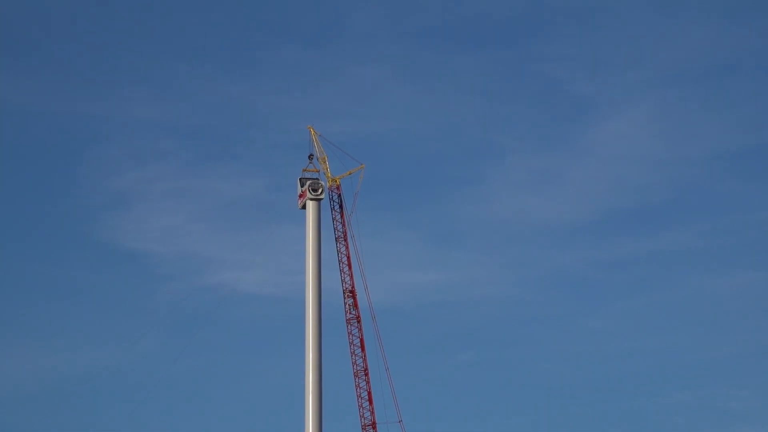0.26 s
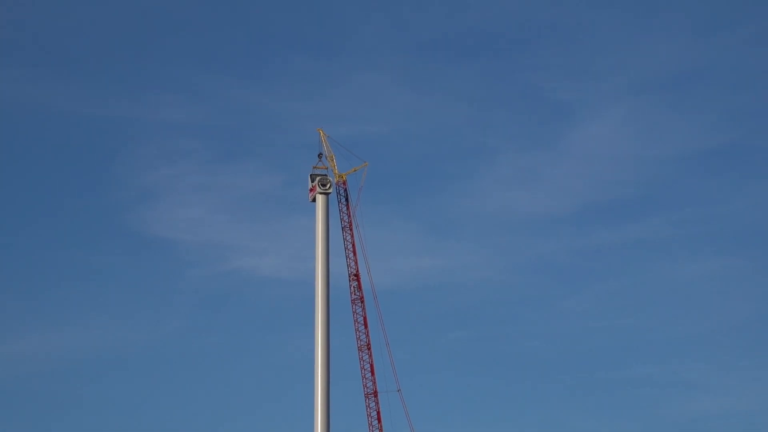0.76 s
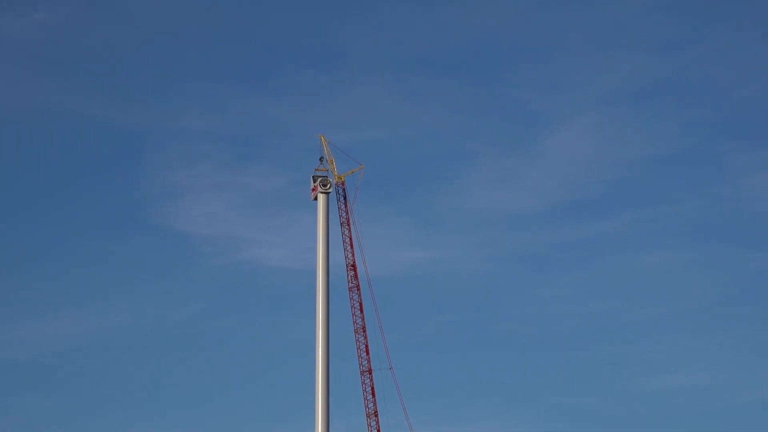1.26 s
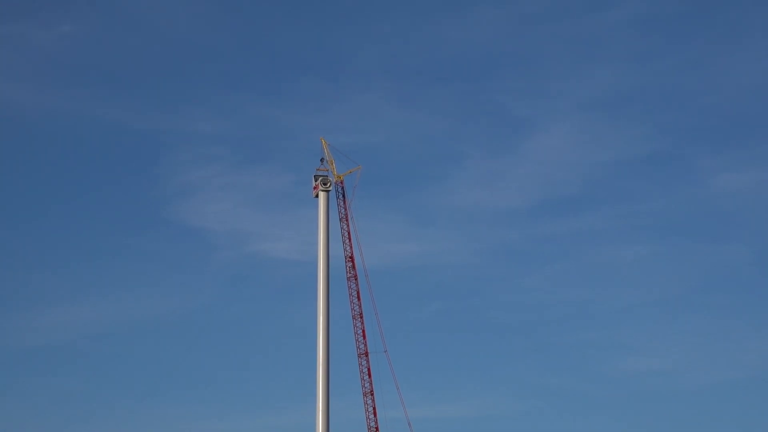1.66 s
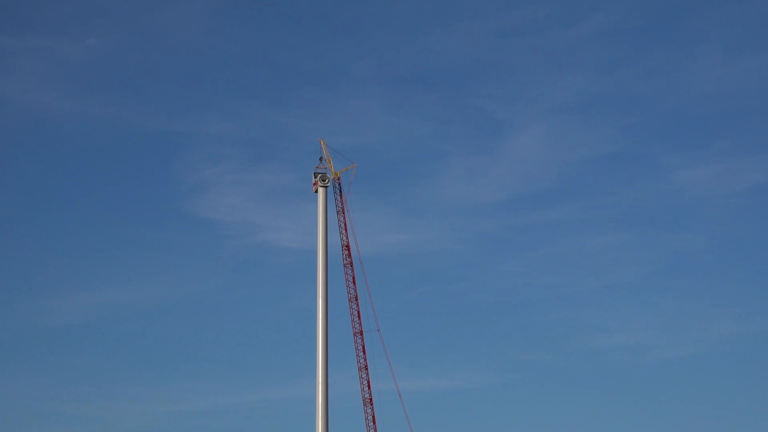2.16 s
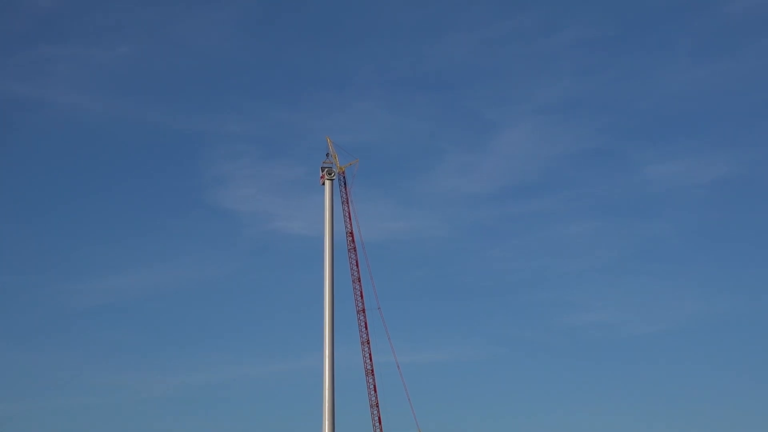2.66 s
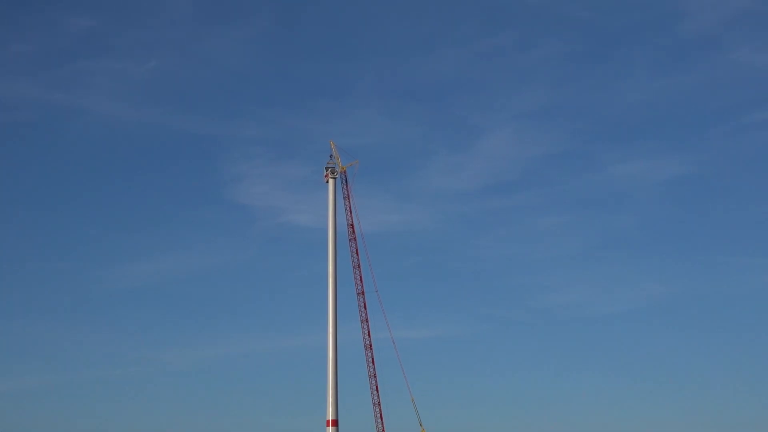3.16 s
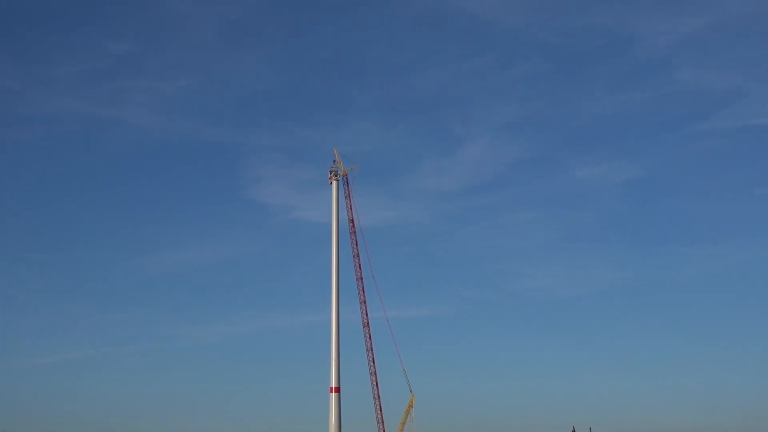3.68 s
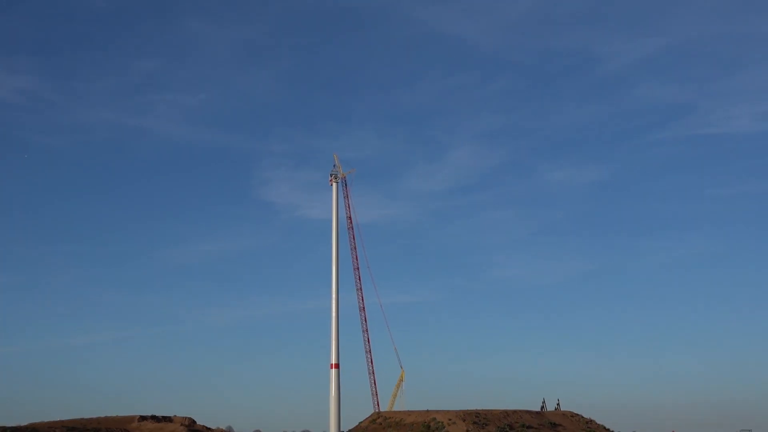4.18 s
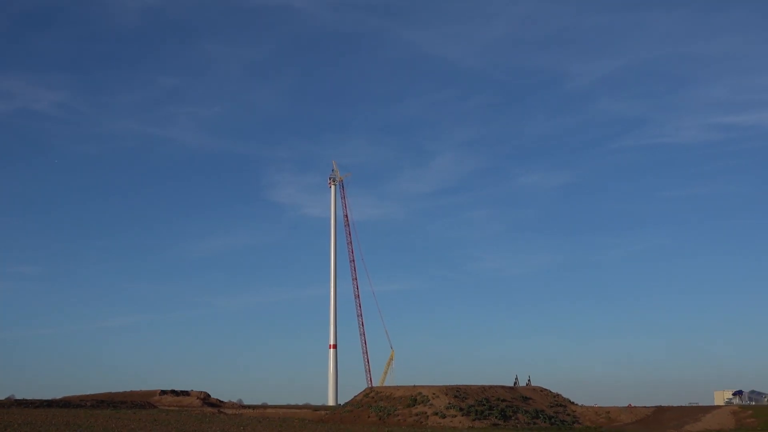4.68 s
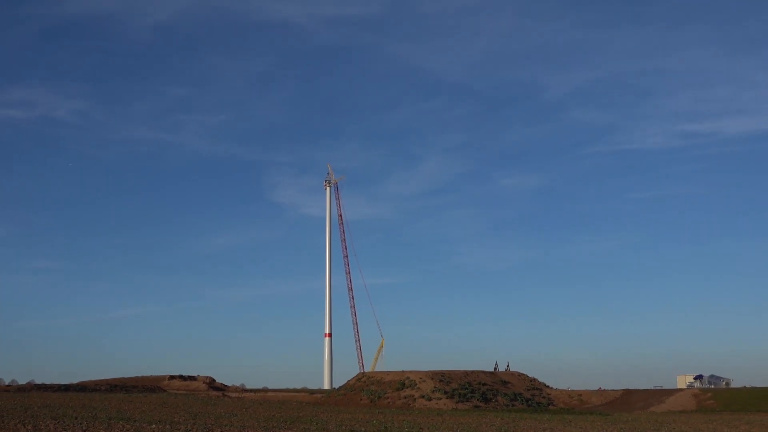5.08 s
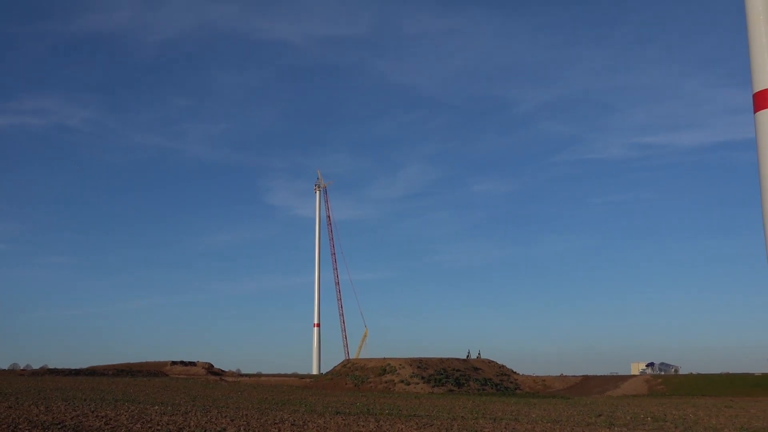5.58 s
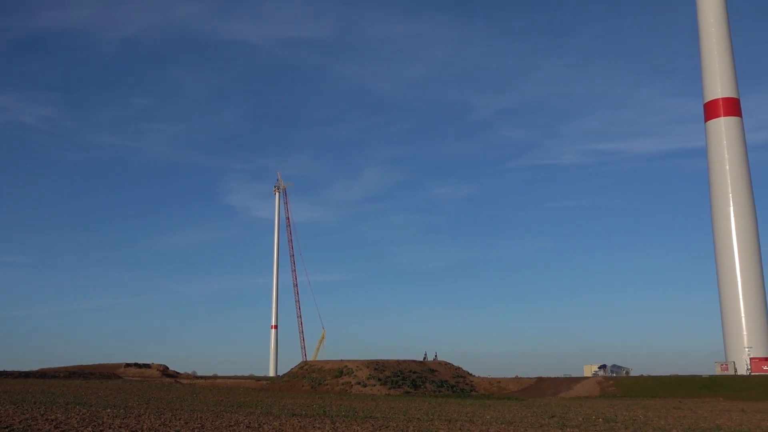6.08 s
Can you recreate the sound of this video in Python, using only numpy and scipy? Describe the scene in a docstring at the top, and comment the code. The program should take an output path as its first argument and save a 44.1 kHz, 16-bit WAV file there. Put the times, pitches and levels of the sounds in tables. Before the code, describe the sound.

Uneven wind gusts thud on the microphone over a far, steady road hiss, with one short nasal bird call late on.

```python
"""The tyre roar of a far motorway comes from the left over open farmland, its bass absorbed by the soft
ground and its treble by the air; far engines rumble under it. Gusts thud as eddies burst on the two
microphone ports. Late on, a crow-like bird to the right calls once, a rasp that locks into a nasal tone,
and the surroundings echo it. The camera's amplifiers hiss, and two faint ticks sound close by."""
import sys
import numpy as np
from scipy import signal
from scipy.fft import rfft, irfft, next_fast_len
from scipy.io import wavfile
from scipy.ndimage import uniform_filter1d

SR = 44100
rng = np.random.default_rng(int(sys.argv[2]) if len(sys.argv) > 2 else 0)


def to_wav(s):
    """Save 16-bit WAV."""
    ch = np.atleast_2d(s).T  # columns
    pcm = np.round(np.clip(ch, -1, 1) * 32767)  # PCM
    wavfile.write(sys.argv[1], SR, pcm.astype(np.int16))


N = 279373
TIME = np.arange(N) / SR
FFT_SIZE = next_fast_len(N + SR)
LOG_HZ = np.log(np.arange(FFT_SIZE // 2 + 1) * SR / FFT_SIZE + 1)

# amplifier noise: (frequency [Hz], relative density [dB])
HISS_SPECTRUM = [(2350, -29), (4000, 4), (4380, 2), (5820, -1), (7730, -2), (12800, -2), (15500, -5)]
# likeness of that noise in the two channels: (frequency [Hz], coherence [0-1])
HISS_COHERENCE = [(4000, 0), (7000, 0.03), (12000, 0.07)]
# far engines: (frequency [Hz], relative density [dB])
RUMBLE_SPECTRUM = [(30, -32), (60, 1), (100, 0), (160, -1), (300, -31.5)]
# close ticks: (time [s], peak [dB], centre [Hz], bandwidth [Hz])
TICK_PULSES = [(2.4897, -48, 5500, 11000), (6.0495, -52, 6900, 4200)]
# course of the tyre roar: (time [s], level [dB], treble lift [dB])
ROAR_LEVELS = [(0, -49, -5.5), (.4, -47, -7.5), (.9, -48, 1.5), (1.15, -47.5, -3), (1.6, -47, -0.5),
               (2.1, -46, -10), (2.5, -48.5, -3.5), (3, -48.5, 0.5), (3.5, -48.5, 4), (3.7, -47.5, -0.5),
               (3.86, -49, 7.5), (4.05, -49, 2.5), (5.2, -48, -0.5), (6.3, -46.5, 2)]
# tyre roar after ground and air absorption: (frequency [Hz], relative density [dB])
ROAR_SPECTRUM = [(260, -53), (450, -22), (597, -17), (706, -12.5), (801, -4.5), (871, -3.5), (947, 2),
                 (1530, 0), (1890, -3.5), (2640, -12), (3470, -25.5), (4060, -39), (5500, -60), (7150, -61),
                 (12100, -120)]
# roar at the ports: (frequency [Hz], extra left level [dB], coherence [0-1], left phase lead [rad])
ROAR_STEREO = [(500, -5, 0.67, -0.18), (800, -2.5, 0.61, -0.16), (1400, 0.5, 0.71, 0.71),
               (2260, 3, 0.15, 0.82), (4060, 4.5, 0.1, 1.)]
# single vehicles: (time [s], half duration [s], whine lift [dB], whine centre [Hz], shift to left [dB])
VEHICLE_PASSES = [(.3, 0.42, 2.5, 1440, 1), (1.15, 0.15, 2.5, 1190, 0), (1.6, 0.47, 1.5, 1940, 1.5),
                  (3.35, 0.34, 4, 1510, 0.6), (4.7, 0.56, 5.5, 1150, -0.6), (5.6, 0.23, 2, 1150, -0.5)]
# course of the gusts: (time [s], level [dB], upper band lift [dB], bass lift [dB])
GUST_LEVELS = [(0, -74, 1, -9), (.68, -75, -5, -5), (.78, -57.5, -9, -1), (1.35, -57.5, -9, -4),
               (1.43, -51.5, -3.5, -5), (1.62, -54.5, -4.5, 2), (1.68, -61.5, -8, -5),
               (2.08, -56.5, -10, -1), (2.12, -51, -2, 5), (2.47, -52, -4.5, -5), (2.54, -66.5, -6, 3),
               (2.7, -61.5, -8.5, 2), (3.25, -64, -11.5, 5), (3.58, -49, 2, -5), (3.72, -43.5, 2, -7),
               (4.04, -47.5, 0.5, -2), (4.56, -44, 1.5, -6), (4.62, -49, -2.5, -6), (4.79, -48, 0.5, -1),
               (4.83, -42, 0.5, -2), (5.05, -49, -3.5, 1), (5.24, -50.5, -2, -3), (5.32, -55, -4.5, 6),
               (5.62, -58, -9, 3), (5.89, -47.5, -9, -5), (6.15, -55, -8.5, 9), (6.33, -45, 4.5, 1)]
# single buffets within the gusts: (time [s], lift [dB])
BUFFET_LIFTS = [(.17, 10), (.9, 8), (1.13, 7), (1.43, 4), (1.73, 5.5), (1.83, 3), (2.11, 2.5), (2.17, 5.5),
                (2.265, 13.5), (2.35, 11), (2.45, 8.5), (2.64, 2), (2.71, 9), (2.91, 4), (3.33, 7.5),
                (3.6, 1), (3.69, 2.5), (3.82, 3.5), (4.17, 6.5), (4.26, 6), (4.34, 7), (4.55, 3), (4.82, 0),
                (5.02, 6), (5.17, 5.5), (5.55, 4), (6.05, 4), (6.18, 7.5)]
# turbulent pressure on the ports: (frequency [Hz], relative density [dB])
THUD_SPECTRUM = [(12, -62), (20, -32.5), (92, 0), (144, 3), (284, -3), (452, -15.5), (597, -28), (741, -35),
                 (800, -26), (1040, -52), (1760, -120)]
# thuds at the ports: (frequency [Hz], extra left level [dB], coherence [0-1], left phase lead [rad])
THUD_STEREO = [(39.8, -1.5, 1, -0.098), (129, 0.5, 0.98, -0.54), (300, 0.5, 0.75, -1.1), (500, 2, 1, -1.46)]
# direct path of the call: (frequency [Hz], left minus right level [dB])
CALL_PAN = [(1000, -8.5), (2200, -18), (3300, -12.5), (4400, -5), (5500, -16), (8000, -3)]
# distinct reflections, before colouring: (delay [s], relative level [dB])
ECHO_PATHS = [(.17, -9), (.29, -14)]
# colour of all reflected sound: (frequency [Hz], gain of the tone [dB], gain of the rasp [dB])
ECHO_GAINS = [(1004, -18, -11), (2200, -3, -11), (3250, 5, 4.5), (3800, -8, 5), (4490, 10.5, 4),
              (4900, -4, -1), (5500, -0.5, 4), (8000, -13, -11)]
# course of the bird's tone: (time [s], pitch [Hz], level [dB])
CALL_CONTOUR = [(4.876, 540.7, -48), (4.885, 542, -34), (4.9, 542.8, -32), (4.95, 540.7, -37),
                (4.968, 537.5, -32), (4.983, 526.5, -40.5), (4.992, 518, -37), (5.012, 494, -41.5),
                (5.028, 488, -70)]
# harmonic series of the tone: (multiple of the pitch [1], relative level [dB])
CALL_HARMONICS = [(1, -52), (2, -13.5), (3, -24.5), (4, -4), (5, -30.5), (6, -27.5), (7, -35), (8, -39),
                  (9, -39), (10, -42), (11, -41), (12, -43), (13, -51.5), (14, -54)]
# noisy part of the call: (frequency [Hz], relative density [dB])
RASP_SPECTRUM = [(700, -22), (1100, -12), (1750, 4), (2000, 2.5), (2350, 5.5), (2900, -10), (4000, -15.5),
                 (6000, -26.5), (7500, -39), (8500, -58), (10000, -50), (13000, -64)]
# air rushing past the beak: (frequency [Hz], relative density [dB])
BREATH_SPECTRUM = [(8000, -25), (9300, 3), (10800, -1), (12000, -16), (14000, -40)]


def undb(db):
    """Amplitude ratio of a level in dB."""
    return 10 ** (np.asarray(db) / 20)


def unit(x):
    """Normalisation to rms 1."""
    return x / np.sqrt(np.mean(np.abs(x) ** 2))


def over_time(table):
    """Linear interpolation of each column, one value a sample."""
    times, *columns = np.transpose(table)
    return [np.interp(TIME, times, column) for column in columns]


def over_hz(table):
    """Interpolation of each column over log frequency, one value a bin."""
    hz, *columns = np.transpose(table)
    return [np.interp(LOG_HZ, np.log(hz), column) for column in columns]


def sides(pan_db):
    """A level difference split evenly into left and right gains."""
    return undb(np.array([pan_db, -pan_db]) / 2)


def bump(centre_s, half_s):
    """Gaussian envelope of height 1."""
    return np.exp(-((TIME - centre_s) / half_s) ** 2)


def drift(rate_hz):
    """Random modulation of rms 1: held values, smoothed twice."""
    hold = int(SR / rate_hz)
    steps = np.repeat(rng.standard_normal(N // hold + 1), hold)
    return unit(uniform_filter1d(uniform_filter1d(steps, hold), hold)[:N])


def coloured(spectrum):
    """White noise filtered to a spectrum, at rms 1."""
    white = rfft(rng.standard_normal(FFT_SIZE))
    return unit(irfft(white * undb(over_hz(spectrum)[0]), FFT_SIZE)[:N])


def port_noise(spectrum, pan_db, coherence, lead_rad):
    """Spectra of partly coherent noise at two ports, with differences of level and phase."""
    shared, own = rfft(rng.standard_normal((2, FFT_SIZE)))
    right = (np.sqrt(coherence) * shared + np.sqrt(1 - coherence) * own) * np.exp(-1j * lead_rad)
    return np.array([shared, right]) * sides(pan_db) * undb(over_hz(spectrum)[0])


def bands(spectra, low_hz, high_hz, count):
    """Complementary filter bank: yields each band's place (0 low, 1 high) and normalised signal."""
    position = np.clip((LOG_HZ - np.log(low_hz)) / np.log(high_hz / low_hz), 0, 1) * (count - 1)
    rms = np.sqrt(np.mean(irfft(spectra.mean(axis=0), FFT_SIZE) ** 2))
    for k in range(count):
        triangle = np.clip(1 - np.abs(position - k), 0, 1)
        yield k / (count - 1), irfft(spectra * triangle, FFT_SIZE)[:, :N] / rms


def amplifier_hiss(level_db=-79.6):
    """Self-noise: each amplifier makes its own, so the channels are nearly incoherent."""
    spectra = port_noise(HISS_SPECTRUM, np.zeros(1), over_hz(HISS_COHERENCE)[0], lead_rad=0)
    hiss = irfft(spectra, FFT_SIZE)[:, :N]
    return hiss * undb(level_db) / np.sqrt(np.mean(hiss.mean(axis=0) ** 2))


def engine_rumble(level_db=-69.5):
    """Long waves from far engines reach both ports alike as a steady bass."""
    return undb(level_db) * coloured(RUMBLE_SPECTRUM)


def ticks():
    """Gaussian pulses: the shorter the pulse, the wider its band."""
    return sum(undb(db) * bump(s, 2 / (np.pi * width_hz)) * np.cos(2 * np.pi * hz * (TIME - s))
               for s, db, hz, width_hz in TICK_PULSES)


def motorway(low_hz=550, high_hz=4200, left_db=5.5, slow_db=.5, flicker_db=.7):
    """Atmospheric fading: moving air makes each band of the distant tyre noise drift on its own."""
    roar_db, treble_db = over_time(ROAR_LEVELS)
    nearness = np.array([bump(s, half_s) for s, half_s, *_ in VEHICLE_PASSES])
    whine_db, whine_hz, shift_db = np.transpose(VEHICLE_PASSES)[2:]
    spectra = port_noise(ROAR_SPECTRUM, *over_hz(ROAR_STEREO))
    roar = 0
    for place, band in bands(spectra, low_hz, high_hz, count=12):
        # air that carries better lifts the treble most
        fading_db = place ** 2 * treble_db + slow_db * drift(2.43) + flicker_db * drift(11)
        # single vehicles add tread whine, higher for faster ones
        band_hz = low_hz * (high_hz / low_hz) ** place
        tread_db = whine_db * np.exp(-(np.log(band_hz / whine_hz) / .25) ** 2)
        roar = roar + undb(fading_db + tread_db @ nearness) * band
    return roar * undb(roar_db) * sides(left_db + shift_db @ nearness)


def wind(buffet_half_s=.026, bass_eddy_share=.31, bass_buffet_share=.28):
    """Turbulence on the ports: small quick eddies shake the upper bands most, large ones the bass."""
    gust_db, upper_db, bass_db = over_time(GUST_LEVELS)
    buffet_db = sum(db * bump(s, buffet_half_s) for s, db in BUFFET_LIFTS)
    eddy_db = .95 * drift(30) + 2.3 * drift(70) + 2.7 * drift(150)
    bass_db = bass_db - (1 - bass_buffet_share) * buffet_db
    spectra = port_noise(THUD_SPECTRUM, *over_hz(THUD_STEREO))
    thuds = 0
    for place, band in bands(spectra, low_hz=56, high_hz=430, count=5):
        shake_db = (bass_eddy_share + (1 - bass_eddy_share) * place) * eddy_db + 1.5 * drift(20.965)
        tilt_db = max(2 * place - 1, 0) * upper_db + max(1 - 2 * place, 0) * bass_db
        thuds = thuds + band * undb(shake_db + tilt_db)
    return thuds * undb(gust_db + buffet_db)


def surroundings(tone, rasp, t60_s=.79, rise_s=.049, echo_half_s=.006, left_db=3.5):
    """Multipath propagation: the call arrives directly, as two echoes and as dense, fading scatter."""
    t = TIME[:SR]
    scatter = undb(-3) * unit(undb(-60 * t / t60_s) * (1 - np.exp(-t / rise_s)))
    echoes = sum(undb(db) * unit(bump(s, echo_half_s)[:SR]) for s, db in ECHO_PATHS)
    response = rng.standard_normal((2, SR)) * (scatter + echoes) / np.sqrt(SR)
    reflected = rfft(response * sides(left_db)[:, None], FFT_SIZE)
    direct = sides(over_hz(CALL_PAN)[0])
    # directivity: the bird beams tone and rasp differently, so their echoes differ in colour
    spectra = sum(rfft(part, FFT_SIZE) * (direct + reflected * undb(colour_db))
                  for part, colour_db in zip((tone, rasp), over_hz(ECHO_GAINS)))
    return irfft(spectra, FFT_SIZE)[:, :N]


def bird(onset_s=4.8, rasp_rise_s=.04, beak_opens_s=.041, pitch_jitter=.00216, breath_db=-46):
    """Voicing: a rasp locks into a nasal harmonic tone, strongest on the fourth partial, that droops."""
    pitch_hz, tone_db = over_time(CALL_CONTOUR)
    lock, locked, _, _, droop, *_, end, silent = np.transpose(CALL_CONTOUR)[0]
    opened = lock + beak_opens_s
    # the opening beak frees the high harmonics; alternating strong and weak cycles make the odd ones
    beak_db = np.interp(TIME, [lock, opened, droop, end], [-13, 0, 0, -14])
    odd_db = np.interp(TIME, [opened, droop], [1, -9])
    phase = 2 * np.pi * np.cumsum(pitch_hz * (1 + pitch_jitter * drift(90))) / SR
    offsets = rng.uniform(0, 2 * np.pi, len(CALL_HARMONICS))
    tone = 0
    for (k, db), offset in zip(CALL_HARMONICS, offsets):
        shimmer_db = 6 * min(.2 - db / 30, 1) * drift(40)  # weak harmonics shimmer most
        partial_db = db + (k > 4) * beak_db + k % 2 * odd_db + shimmer_db
        tone = tone + np.sqrt(2) * undb(partial_db) * np.sin(k * phase + offset)
    rasp_db = np.interp(TIME, [onset_s, onset_s + rasp_rise_s, lock, locked, droop, end, silent],
                        [-70, -47, -42, -48.5, -57, -52, -70])
    rasp = coloured(RASP_SPECTRUM) * undb(rasp_db + drift(250))  # flutters by about 1 dB
    voicing = undb(tone_db) * (TIME > lock)
    breath = coloured(BREATH_SPECTRUM) * undb(breath_db) * voicing
    calling = (TIME > onset_s) & (TIME < silent)
    return calling * tone * voicing, calling * (rasp + breath)


def scene():
    """Superposition of all sources in the two channels."""
    return motorway() + engine_rumble() + wind() + surroundings(*bird()) + ticks() + amplifier_hiss()


def record(dry):
    """Band limiting: the camera's steep low-pass filter cuts the treble above 15.7 kHz."""
    return signal.sosfilt(signal.ellip(10, .2, 60, 15700, fs=SR, output="sos"), dry)


dry = scene()
out = record(dry)
to_wav(out)
```